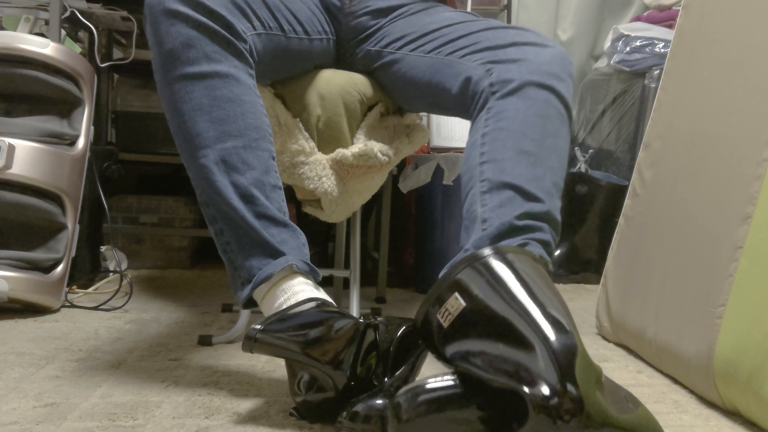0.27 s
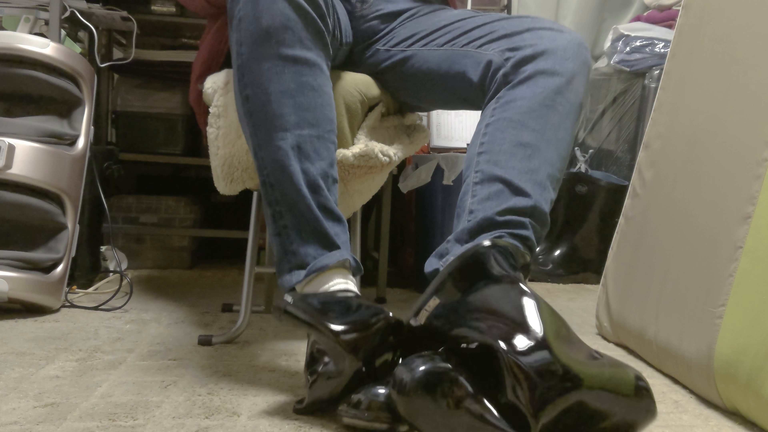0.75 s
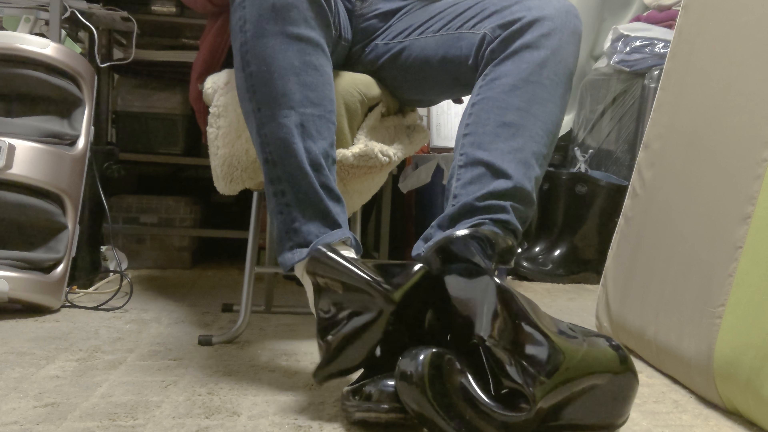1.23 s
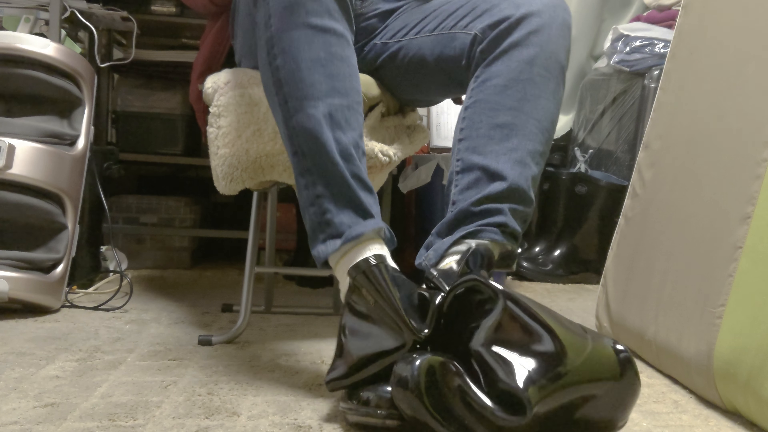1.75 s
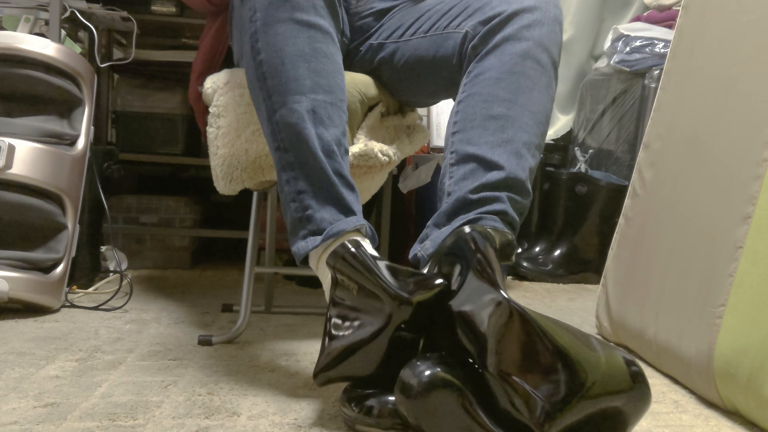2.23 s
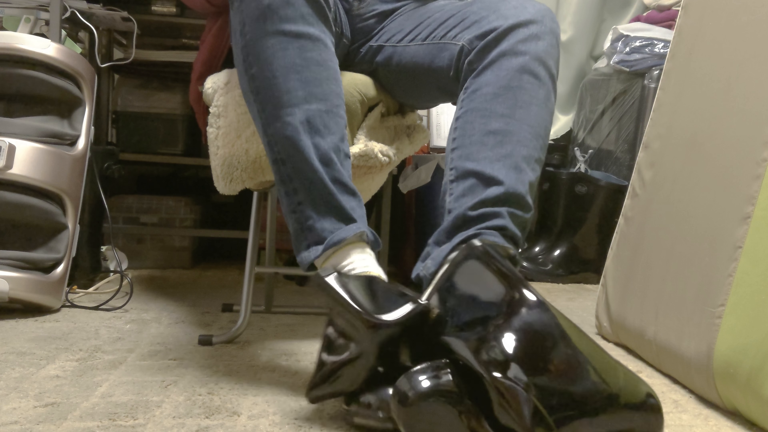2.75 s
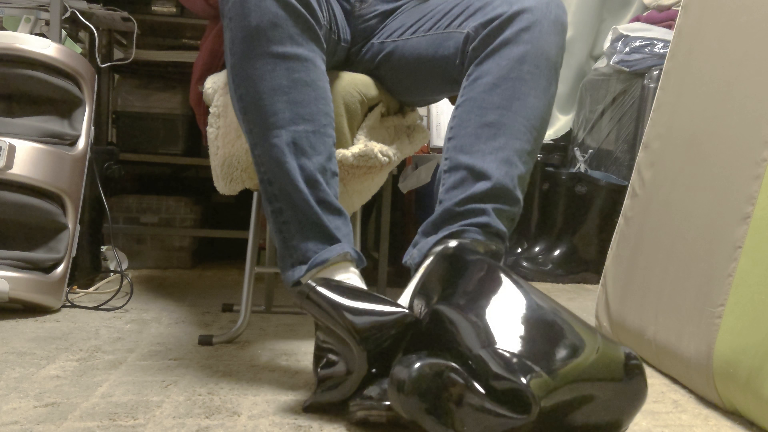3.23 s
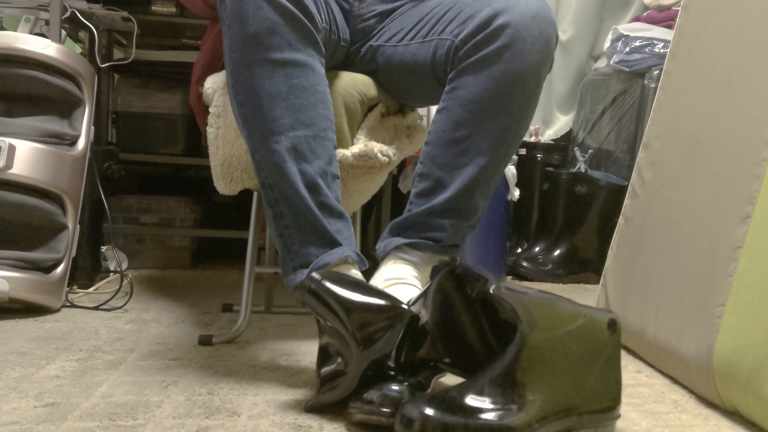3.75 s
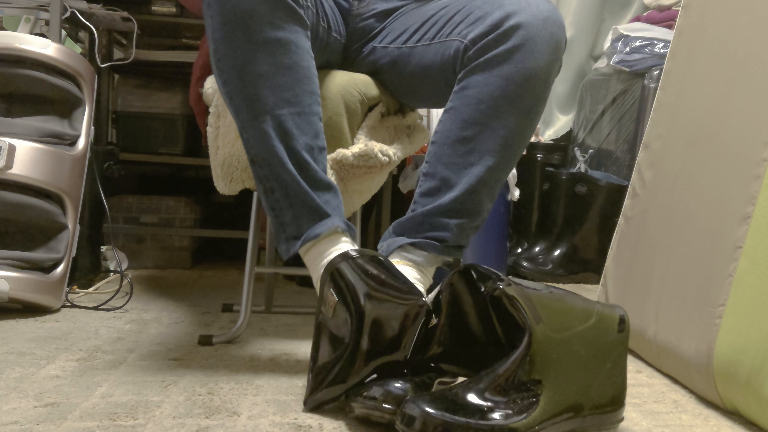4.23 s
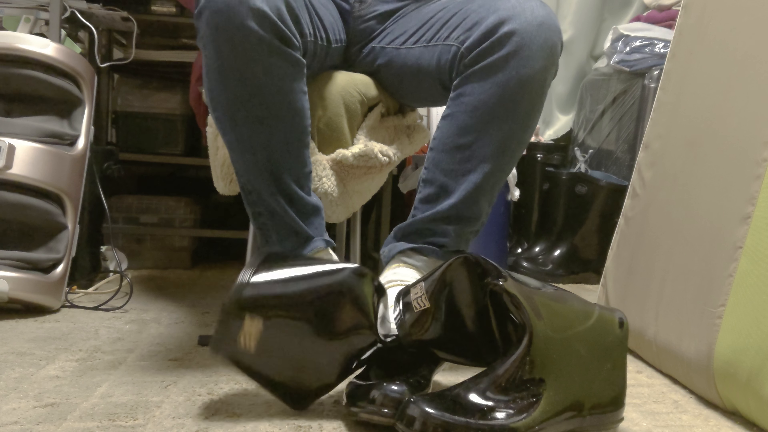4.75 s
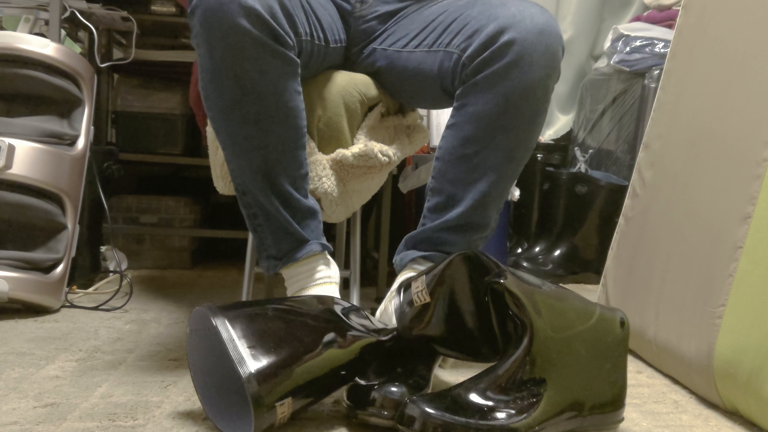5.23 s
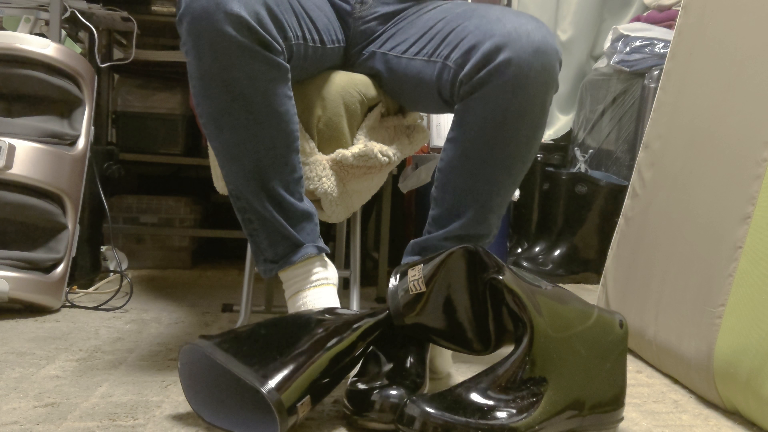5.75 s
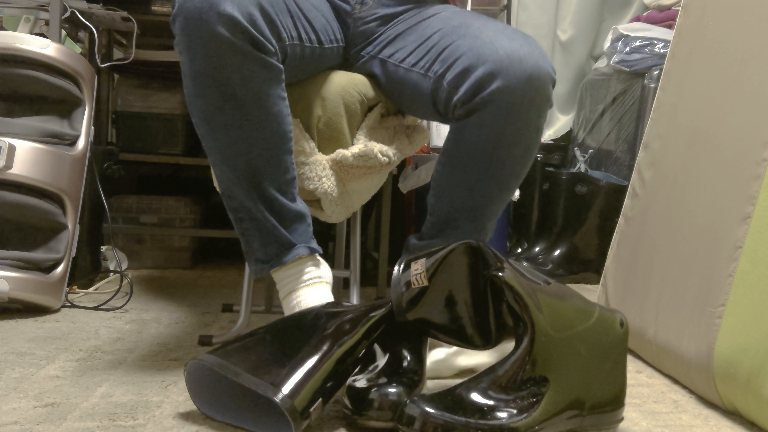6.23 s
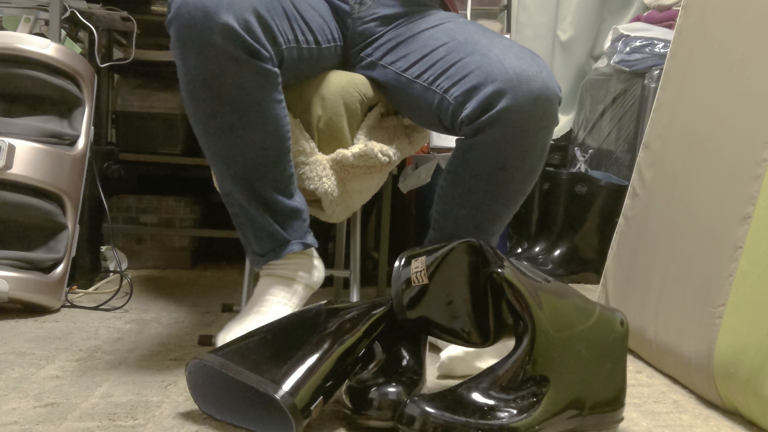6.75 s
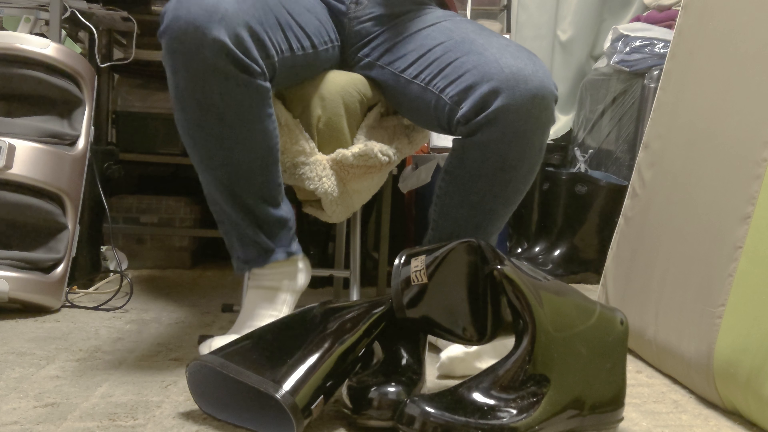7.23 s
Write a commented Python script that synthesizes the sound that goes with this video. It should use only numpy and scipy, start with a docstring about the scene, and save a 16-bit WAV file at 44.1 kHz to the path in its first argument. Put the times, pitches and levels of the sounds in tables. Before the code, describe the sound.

Close up in a small room with a faint low appliance hum, thin glossy rubber boots are rubbed together. Sparse creaks soon become dense bursts of falling chirps, rasps and hollow buckling pops with low soft thuds. A foot slides out with a brief hiss and the boot drops dully. Thinner creaks follow, then soft knocks on the empty rubber, and mostly hum.

```python
"""Throughout, an appliance hums in a small room: unsteady sine lines over coloured noise.
From the start someone seated rubs one glossy rubber boot against the other to work the pair off.
Stick-slip sends bending waves through the thin wall, heard as falling chirps, creaks and rasps.
Soon folds buckle and ring the air in the shafts; flexing boots thud low, some thuds meeting the floor.
Later a sock slides out as hissing noise, a boot drops, and soft knocks sound on the empty boot."""
import sys
import numpy as np
from scipy import signal
from scipy.fft import rfft, irfft
from scipy.io import wavfile
from scipy.ndimage import uniform_filter1d, map_coordinates

SR = 44100
rng = np.random.default_rng(int(sys.argv[2]) if len(sys.argv) > 2 else 0)


def dump(signal):
    """Clip the signal to [-1, 1] and save it as 16-bit WAV at the path in sys.argv[1]."""
    limited = np.clip(np.atleast_2d(signal).T, -1, 1)
    pcm = np.round(limited * 32767).astype(np.int16)
    wavfile.write(sys.argv[1], SR, pcm)


N = 330309
T = np.arange(N) / SR  # time in s

# All levels are relative, ahead of the mix.
# motor hum lines: pitch_hz, level_db
HUM_LINES = [(91.5, -52.5), (150.7, -55), (183.0, -46)]
# spectrum of the moving air: frequency_hz, gain_db
AIR_COLOUR = [(25, -56), (48, -8.5), (88, -3.5), (125, -15.5), (160, -16), (195, -17.5), (230, -20.5),
              (500, -18.5), (720, -8.5), (920, -20.5), (1300, -18.5), (2000, -32.5), (6000, -46),
              (9000, -101)]
# left-right balance of the moving air: frequency_hz, left_minus_right_db
AIR_BALANCE_CURVE = [(200, 1), (380, 5.5), (700, 21), (1300, 14.5), (2400, 0.5)]
# stereo width of the moving air: frequency_hz, side_minus_mid_db
AIR_WIDTH = [(150, -9), (300, 0), (640, -0.5)]
# spectrum of the faint hiss: frequency_hz, gain_db
HISS_COLOUR = [(3000, -29), (9000, 6), (10000, 9), (12000, 2)]
# stereo width of the room's echoes: frequency_hz, side_minus_mid_db
ROOM_WIDTH = [(380, -11), (700, -4), (1300, 0.5)]
# response of the microphone: frequency_hz, gain_db
MIC_RESPONSE = [(24, -38), (38, 0.5), (5600, 1), (6500, -4), (7500, -19.5), (8500, -4), (9100, -9),
                (9900, 4.5)]
# the sock sliding out of the shaft: time_s, level_db
SOCK_SLIDE = [(3.2, -65), (3.49, -53), (3.53, -53), (3.61, -58), (3.66, -75), (3.8, -90)]
# spectrum of the sliding sock and of the crease ticks: frequency_hz, gain_db
SOCK_COLOUR = [(2000, -14), (5000, 17), (10500, 21), (16000, 22)]
# tiny ticks of creases: start_s, level_db
CREASE_TICKS = [(0.441, -47), (1.742, -35), (3.41, -45), (3.474, -37), (3.857, -47), (6.414, -52),
                (6.806, -44.5), (7.417, -49.5)]
# brief squeaks of the glossy skin: start_s, pitch_hz, level_db, length_s
SKIN_SQUEAKS = [(0.958, 5920, -25.5, 0.0082), (1.852, 910, -30, 0.018), (2.669, 4630, -38, 0.027),
                (2.816, 4830, -21, 0.0091), (4.23, 5300, -38, 0.003), (4.248, 5550, -36, 0.0024),
                (4.269, 5600, -32.5, 0.0025), (4.466, 824, -28, 0.02), (4.572, 1017, -32, 0.033),
                (6.804, 5500, -46.5, 0.01), (7.208, 3080, -40.5, 0.015), (7.209, 5280, -48, 0.015)]
# low, soft thuds of the flexing boots, some meeting the floor: start_s, pitch_hz, level_db, t60_s
LOW_THUDS = [(0.976, 50, -23, 0.58), (1.122, 82.2, -26, 0.57), (1.871, 50.7, -27, 0.5),
             (2.848, 87, -23, 0.31), (2.925, 56.3, -18.5, 0.26), (3.845, 82, -13, 0.075),
             (3.868, 46, -17.5, 0.46)]
# soft knocks on the empty boot: start_s, level_db
BOOT_KNOCKS = [(5.07, -30), (5.274, -27), (5.519, -31)]
# spectrum of a knock: frequency_hz, gain_db
KNOCK_SPECTRUM = [(100, -12), (260, 6), (1100, -13), (2500, -43)]
# folds that buckle, each ringing mostly the modes near its own pitch: start_s, level_db, pitch_hz
FOLD_BUCKLES = [(0.9422, -15, 270), (0.969, -8, 270), (1.067, -16, 270), (1.232, -12.5, 260),
                (1.463, -9.5, 266), (1.746, -14.5, 425), (1.867, -10, 445), (1.879, -11, 500),
                (1.902, -20, 480), (1.925, -11, 485), (1.998, -18.5, 500), (2.05, -25, 509),
                (2.547, -17, 411), (2.662, -12, 273), (2.678, -14, 1000), (2.714, -19, 510),
                (2.737, -14.5, 470), (2.798, -12.5, 276), (2.888, -29, 1030), (3.412, -24.5, 390),
                (3.473, -16.5, 374), (3.593, -12, 424), (3.607, -14, 184), (4.059, -23.5, 210)]
# modes of the hollow shaft: pitch_hz (before detuning), t60_s
AIR_MODES = [(184, 0.083), (266, 0.044), (390, 0.058), (432, 0.044), (494, 0.071), (1020, 0.032)]
# rubbing of a tightly stretched patch of skin: start_s, length_s, level_db
TAUT_PATCHES = [(1.158, 0.09, -43), (2.79, 0.12, -39), (4.17, 0.2, -43.5)]
# modes of the stretched skin: pitch_hz (before flexing), level_db
TAUT_MODES = [(1460, -12), (1710, 7.5), (1960, 4), (2720, -8.5), (3570, -8), (4060, -9.5)]
# fast slides that rasp: start_s, length_s, level_db
FAST_SLIDES = [(1.086, 0.044, -39), (1.83, 0.04, -28), (2.38, 0.15, -44), (2.79, 0.125, -41.5),
               (3.497, 0.089, -25.5)]
# spectrum of a rasp: frequency_hz, gain_db
RASP_SPECTRUM = [(250, -8), (440, 10), (600, -4.5), (1100, -3), (1500, -9), (2200, -12.5), (2900, -23.5)]
# strokes of one boot along the other: start_s, length_s, creak_db, scrape_db
BOOT_STROKES = [(0.0, 0.047, -46.5, -43.5), (0.47, 0.48, -45.5, -49.5), (0.778, 0.12, -35.5, -39),
                (0.936, 0.053, -33, -36), (1.077, 0.057, -26.5, -36), (1.159, 0.045, -43, -36),
                (1.252, 0.14, -42, -40.5), (1.387, 0.11, -34, -33), (1.542, 0.17, -40, -39.5),
                (1.726, 0.025, -26, -30), (1.862, 0.056, -37, -35), (1.987, 0.065, -39, -35.5),
                (2.352, 0.19, -39.5, -40.5), (2.648, 0.13, -37, -39.5), (2.794, 0.031, -23.5, -39),
                (2.852, 0.056, -35, -54), (2.943, 0.035, -27.5, -40), (3.034, 0.34, -39.5, -44.5),
                (3.37, 0.32, -45, -43.5), (3.54, 0.075, -28.5, -39.5), (3.611, 0.19, -45, -48.5),
                (3.827, 0.16, -39.5, -47), (4.024, 0.54, -42, -51), (4.215, 0.16, -40, -45),
                (4.434, 0.042, -37, -44)]
# long, faint rubbing in light contact, beneath the strokes: start_s, length_s, creak_db, scrape_db
LIGHT_RUBBING = [(0.083, 4.6, -52, -58.5), (0.814, 2, -53, -47)]
# spectrum of the creaking wall: frequency_hz, gain_db
CREAK_COLOUR = [(110, 4), (180, 4.5), (255, 8.5), (350, 2), (480, 8.5), (560, -0.5), (720, 2.5),
                (1100, -8.5), (1400, -17), (3000, -49)]
# spectrum of the scraping skin: frequency_hz, gain_db
SCRAPE_COLOUR = [(500, -62), (1000, 8), (2000, 6), (3200, 0), (4600, -2), (6000, -8), (9000, -11),
                 (16000, -18)]
# runs of catching and letting go at a nearly even pace: start_s, pace_per_s, strength_db, release_ms
STUTTER_RUNS = [(0.795, 88, -31, 0.17), (0.952, 132, -27.5, 0.017), (2.8, 180, -27, 0.48),
                (3.015, 84, -25, 1.2), (3.106, 46, -26.5, 1.23)]
# big slips of rubber on rubber; a quick release is brighter: start_s, strength_db, release_ms
BIG_SLIPS = [(0.019, -28, 0.88), (0.457, -28.5, 0.58), (0.497, -26, 0.59), (0.53, -22.5, 1.4),
             (0.837, -21, 0.78), (0.8441, -22.5, 0.12), (0.8828, -19, 0.11), (0.916, -21.5, 0.12),
             (0.942, -13.5, 1.3), (0.982, -10, 1.7), (1.0343, -20.5, 0.59), (1.0668, -10.5, 1.3),
             (1.0898, -12.5, 0.46), (1.1005, -12.5, 0.8), (1.1219, -9.5, 0.82), (1.1555, -8.5, 0.48),
             (1.1865, -12, 0.46), (1.229, -10.5, 0.44), (1.2666, -19, 1), (1.291, -22, 0.32),
             (1.3235, -18, 0.6), (1.347, -21.5, 0.5), (1.377, -19.5, 0.69), (1.464, -15, 0.85),
             (1.5378, -20, 0.5), (1.5814, -20, 0.82), (1.646, -17.5, 1.2), (1.654, -21.5, 0.49),
             (1.737, -14.5, 0.99), (1.746, -17, 1.6), (1.8666, -11.5, 1.25), (1.877, -13.5, 1.3),
             (1.925, -13, 1.05), (1.986, -16.5, 1.05), (2.011, -22, 1.5), (2.495, -17.5, 1.9),
             (2.5482, -21, 0.57), (2.627, -21, 0.85), (2.662, -9.5, 0.97), (2.678, -12, 0.64),
             (2.743, -14.5, 0.76), (2.789, -13.5, 0.68), (2.836, -16.5, 0.61), (2.858, -14, 0.99),
             (2.8895, -13, 0.98), (2.95, -15.5, 0.91), (3.053, -26.5, 0.33), (3.063, -21, 1.5),
             (3.085, -28, 0.93), (3.163, -33.5, 0.069), (3.286, -22, 0.7), (3.3147, -19.5, 0.78),
             (3.344, -23.5, 1.4), (3.4109, -19, 1.55), (3.474, -19.5, 0.81), (3.501, -17, 1.3),
             (3.9191, -24, 0.65), (4.058, -25, 0.78), (4.222, -27, 0.49), (4.24, -27, 0.44),
             (4.275, -23, 1.4), (4.2965, -22.5, 0.79), (4.435, -23.5, 1.3), (4.467, -31, 1.6),
             (4.672, -39, 0.32), (7.039, -50, 0.1)]
# spectrum of the wall's answer to a slip: frequency_hz, gain_db
WALL_COLOUR = [(30, -2), (130, -30), (265, 5), (520, 2), (2900, -5), (4500, -4.5), (6500, -23),
               (16000, -21.5)]


def undb(db):
    """Level: twenty decibels are a tenfold amplitude gain."""
    return 10 ** (np.asarray(db) / 20)


def unit(x):
    """Normalization: scale to an rms of 1."""
    return x / np.sqrt(np.mean(x ** 2))


def gains(points, size):
    """Frequency response: gains on the transform's bins, interpolated in dB over log frequency."""
    hz, db = np.transpose(points)
    bins_hz = np.fft.rfftfreq(size, 1 / SR)
    return undb(np.interp(np.log(bins_hz + 1), np.log(hz), db))


def colour(x, points):
    """Linear filtering: multiply the spectrum by a frequency response."""
    size = x.shape[-1]
    return irfft(rfft(x) * gains(points, size), size)


def stereo_noise(side_points, size):
    """Interchannel coherence: two noises are alike where the side signal is weak."""
    side_gain = gains(side_points, size)
    mid, side = rfft(rng.standard_normal((2, size)))
    left, right = mid + side_gain * side, mid - side_gain * side
    return irfft(np.array([left, right]) / np.sqrt(1 + side_gain ** 2), size)


def walk(rate):
    """Random modulation: a smooth fluctuation of spread 1 with about rate new values per second."""
    hold = int(SR / rate)
    steps = np.repeat(rng.standard_normal(N // hold + 1), hold)
    return unit(uniform_filter1d(steps, hold)[:N])


def add(track, start_s, sound):
    """Superposition: sounds that overlap in time add."""
    i = max(int(start_s * SR), 0)
    track[i:i + len(sound)] += sound[:N - i]


def effort(strokes):
    """Contact pressure: each stroke takes hold, stays and dies away; one gain curve per level column."""
    attack_s, release_s = 0.0077, 0.009
    power = np.zeros((len(strokes[0]) - 2, N))
    for start_s, length_s, *levels_db in strokes:
        t = T[:int((length_s + 10 * release_s) * SR)]
        shape = np.minimum(t / attack_s, 1) * np.exp(-np.maximum(t - length_s, 0) / release_s)
        for track, db in zip(power, levels_db):
            add(track, start_s, (undb(db) * shape) ** 2)
    return np.sqrt(power)


def flexing(x, share, rate):
    """Elastic tension: rubber stretches and slackens, so its resonances wander by this rms share."""
    drift = np.cumsum(share * walk(rate))
    return map_coordinates(x, [np.arange(N) + drift], mode="mirror")


def bending_wave(points, travel_s, folds_db, size=2048, count=36):
    """Dispersion: bending waves speed up with the root of frequency, so lows come late (travel_s at 1 kHz)."""
    # chance resonances of the fold, strongest in the treble
    spread_db = folds_db * np.linspace(.4, 1.3, count)
    folds = np.column_stack([np.geomspace(200, 16000, count), spread_db * rng.uniform(-1, 1, count)])
    # a minimum-phase snap: fold the cepstrum onto positive times
    cepstrum = irfft(np.log(gains(points, size) * gains(folds, size)))
    cepstrum[1:size // 2] *= 2
    cepstrum[size // 2 + 1:] = 0
    phase = 4 * np.pi * travel_s * np.sqrt(1000 * np.fft.rfftfreq(size, 1 / SR))
    return irfft(np.exp(rfft(cepstrum) - 1j * phase))


def micro_slips(rate, scatter_db, travel_s, count=200):
    """Irregular stick-slip: rate small slips per second; each successive fold has its own colour."""
    gap, size, sign = rng.random((int(rate * N / SR), 3)).T
    clock = np.cumsum(.3 - np.log(gap))  # uneven intervals, never shorter than a minimum
    train = np.zeros(N)
    places = (clock / clock[-1] * (N - 1)).astype(int)
    train[places] = np.sign(sign - .5) * undb(scatter_db * size ** 2)
    edges = (np.arange(count + 1) * N / count).astype(int)  # a new fold grips every 0.037 s
    out = np.zeros(N)
    for start, stop, path in zip(edges, edges[1:], .5 + rng.random(count)):
        snap = bending_wave([(20, 0), (20000, 0)], travel_s * path, folds_db=6)
        add(out, start / SR, unit(signal.fftconvolve(train[start:stop], snap) + 1e-9))
    return unit(out)


def appliance(hum_db=-1, air_db=-46.5, hiss_db=-65):
    """Tonal and broadband noise: a wavering motor hum and moving air from the left, over an even hiss."""
    hum = np.zeros(N)
    for hz, db in HUM_LINES:
        level = undb(db + 1.3 * walk(9))
        phase = 2 * np.pi * np.cumsum(hz + 2.5 * walk(20)) / SR
        hum += level * np.sqrt(2) * np.sin(phase)
    left, right = colour(stereo_noise(AIR_WIDTH, N), AIR_COLOUR)
    air = np.array([left, colour(right, [(hz, -db) for hz, db in AIR_BALANCE_CURVE])])
    air *= undb(air_db) / air.mean(axis=0).std()
    hiss = unit(colour(rng.standard_normal((2, N)), HISS_COLOUR))
    return undb(hum_db) * hum * undb([[1.2], [-1.2]]) + air + undb(hiss_db) * hiss


def room(x, early_db=-8, early_s=0.003, tail_db=-12, tail_t60=0.27, count=12):
    """Reflection and reverberation: floor and furniture answer in milliseconds, then a short tail."""
    t = T[:SR // 2]
    # the echoes change as the contact moves about: blend several places at constant power
    places = np.array([walk(8) for _ in range(count)])
    places /= np.sqrt(np.sum(places ** 2, axis=0))
    out = np.array([np.roll(x, shift=1), x])  # the direct sound reaches the right channel first
    for share in places:
        early = stereo_noise(ROOM_WIDTH, len(t)) * np.exp(-t / early_s) * (t > .0008)
        tail = stereo_noise(ROOM_WIDTH, len(t)) * np.exp(-np.log(1000) * t / tail_t60) * (t > .008)
        echoes = (undb(early_db) * unit(early) + undb(tail_db) * unit(tail)) / np.sqrt(len(t))
        echoes = colour(echoes, [(350, -0.5), (1000, 6.0), (5000, 8), (11000, 4.0)])
        out += signal.oaconvolve((share * x)[None], echoes, axes=1)[:, :N]
    return 0.71 * out * undb([[.3], [-.3]])


def sock():
    """Friction noise: fabric hisses along the lining as the foot comes free."""
    slide_db = np.interp(T, *np.transpose(SOCK_SLIDE), left=-120, right=-120)
    level = undb(slide_db + 2 * walk(220))
    return level * unit(colour(rng.standard_normal((2, N)), SOCK_COLOUR))


def ticks(decay_s=0.00077, tick_db=-8):
    """Impulsive release: creases let go with a thin bright tick of decaying noise."""
    out, t = np.zeros(N), T[:SR // 100]
    for start_s, db in CREASE_TICKS:
        add(out, start_s, undb(db + tick_db) * np.exp(-t / decay_s) * rng.standard_normal(len(t)))
    return colour(out, SOCK_COLOUR)


def squeaks(rough=0.14):
    """Rapid stick-slip: very fast cycles fuse into a short, unsteady whistle."""
    out = np.zeros(N)
    for start_s, hz, db, length_s in SKIN_SQUEAKS:
        u = 4 * T[:SR // 8] / length_s  # the envelope peaks at u = 1
        phase = 2 * np.pi * np.cumsum(hz * (1 + rough * walk(hz)[:len(u)])) / SR
        add(out, start_s, undb(db) * u * np.exp(1 - u) * np.sin(phase))
    return out


def thuds(rise_s=0.0047, overtone_db=-18):
    """Damped vibration: the flexing boots thud low and soft, some on the floor, with a weak overtone."""
    out, t = np.zeros(N), T[:SR // 2]
    for start_s, hz, db, t60 in LOW_THUDS:
        phase = 2 * np.pi * hz * t
        thud = np.sin(phase) + undb(overtone_db) * np.sin(1.8 * phase)
        envelope = np.exp(-np.log(1000) * t / t60) * (1 - np.exp(-t / rise_s))
        add(out, start_s, undb(db) * envelope * thud)
    return out


def knocks(travel_s=0.00337):
    """Dispersion over a long path: a nudge sends a dull wave down the slack shaft, slowly falling in pitch."""
    out = np.zeros(N)
    for start_s, db in BOOT_KNOCKS:
        wave = bending_wave(KNOCK_SPECTRUM, travel_s, folds_db=6)
        add(out, start_s, undb(db) * wave / np.abs(wave).max())
    return out


def buckles(ring_db=3.5, rise_s=0.00085, sag=0.0081, other_modes_db=-20):
    """Cavity resonance: a buckling fold rings the shaft's air; its moving wall makes pitch sag and shake."""
    width_octaves, detune_share = 0.087, 0.028
    out, t = np.zeros(N), T[:SR // 3]
    shake = np.cumsum(.025 * walk(500))
    hz, t60 = np.transpose(AIR_MODES)[:, :, None]
    fade = undb(-60 * t / t60)
    sagging = np.cumsum(1 + sag * (fade - .5), axis=1)
    for (start_s, db, fold_hz), detune in zip(FOLD_BUCKLES, rng.uniform(-1.8, 1, len(FOLD_BUCKLES))):
        near = np.exp(-(np.log2(hz / fold_hz) / width_octaves) ** 2)
        share = near / near.max() + undb(other_modes_db)
        drift = shake[int(start_s * SR):][:len(t)]
        mode_hz = hz * (1 + detune_share * detune)
        phase = 2 * np.pi * mode_hz * (sagging + drift - drift[0]) / SR
        ring = np.sum(share * fade * np.sin(phase), axis=0) / np.linalg.norm(share)
        add(out, start_s, undb(db + ring_db) * (1 - np.exp(-t / rise_s)) * ring)
    return out


def taut_skin(ring_s=0.0031):
    """Driven resonance: crowded slips keep the narrow modes of the stretched skin ringing."""
    t = T[:SR // 20]
    modes = sum(undb(db) * np.sin(2 * np.pi * hz * t) for hz, db in TAUT_MODES)
    ring = modes * np.exp(-t / ring_s)
    dense = micro_slips(rate=1500, scatter_db=10, travel_s=.0004)
    sung = flexing(signal.oaconvolve(dense, ring)[:N], share=0.018, rate=10)
    return effort(TAUT_PATCHES)[0] * unit(sung)


def rasps():
    """Dense stick-slip: in a fast slide the slips crowd together into a fine, even rasp."""
    dense = micro_slips(rate=1800, scatter_db=8, travel_s=.0008)
    return effort(FAST_SLIDES)[0] * unit(colour(dense, RASP_SPECTRUM))


def rubbing(creak_db=4.5, scrape_db=-2, flex_db=-15):
    """Friction excitation: small slips creak in the wall and scrape its surface, while the shaft flexes."""
    creak, scrape = effort(BOOT_STROKES + LIGHT_RUBBING)
    coarse = micro_slips(rate=430, scatter_db=24, travel_s=.0011)
    fine = micro_slips(rate=520, scatter_db=30, travel_s=.0004)
    wall = unit(flexing(colour(coarse, CREAK_COLOUR), share=.06, rate=20))
    surface = unit(colour(1.1 * coarse + fine, SCRAPE_COLOUR))
    shaft = unit(colour(rng.standard_normal(N), [(25, -31), (50, 1), (90, 3), (250, -25.0)]))
    return undb(creak_db) * creak * wall + undb(scrape_db) * scrape * surface + undb(flex_db) * creak * shaft


def stutters(count=8, jitter=0.14, scatter_db=3.5):
    """Near-periodic stick-slip: short runs of slips, slightly uneven in pace and strength."""
    rows = []
    for start_s, rate, db, release_ms in STUTTER_RUNS:
        late, strong = rng.standard_normal((count, 2)).T
        times = start_s + (np.arange(count) + jitter * late) / rate
        rows += [(s, db + scatter_db * k, release_ms) for s, k in zip(times, strong)]
    return rows


def slips(travel_s=0.001333, slip_db=-3, chatter_db=-10, chatter_s=0.014,
          wobble_db=-26, wobble_hz=47, wobble_s=0.14):
    """Stick-slip: each release is a falling chirp, dull above 1 / release time, with chatter and wobble."""
    rolloff_db_per_octave, chatter_per_s = 12.5, 900
    low_cut = 0.049  # a quick slip moves a small patch: no bass under this share of 1 / release time
    out, t = np.zeros(N), T[:SR // 3]
    hz = np.geomspace(30, 16000, 40)
    colour_hz, colour_db = np.transpose(WALL_COLOUR)
    wall_db = np.interp(np.log(hz), np.log(colour_hz), colour_db)
    wobble = np.exp(-t / wobble_s) * np.sin(2 * np.pi * wobble_hz * t)  # of the whole shaft
    for start_s, db, release_ms in BIG_SLIPS + stutters():
        cycles = hz * release_ms / 1000  # within one release
        octaves_over = np.log2(1 + cycles ** 3) / 3
        thin_db = 10 * np.log10(1 + (low_cut / cycles) ** 2)
        points = np.column_stack([hz, wall_db - rolloff_db_per_octave * octaves_over - thin_db])
        snap = bending_wave(points, travel_s * rng.uniform(0.727, 1.274), folds_db=4.5)
        snap *= np.sqrt(.004 * SR / np.sum(snap ** 2))  # rms 1 over 4 ms
        # the contact chatters briefly after the main slip
        hits = (rng.random(len(t)) < chatter_per_s / SR) * rng.uniform(-1.17, 1, len(t))
        jerks = undb(chatter_db) * hits * np.exp(-t / chatter_s)
        jerks[0] = 1
        chirps = signal.fftconvolve(np.trim_zeros(jerks[:SR // 10]), snap)
        add(out, start_s, undb(db + slip_db) * chirps)
        add(out, start_s, undb(db + wobble_db) * wobble)
    return out


def scene():
    """Superposition of sources: the boots in the room, the sock and the appliance."""
    boots = thuds() + knocks() + ticks() + squeaks() + buckles()
    boots += taut_skin() + rasps() + rubbing() + slips()
    return appliance() + sock() + room(boots)


def record(dry):
    """Transducer response: the microphone has a deep notch in the treble, and the top is cut."""
    top_cut = signal.ellip(10, .2, 70, 15950, fs=SR, output="sos")  # order, ripple dB, stop dB, edge Hz
    return signal.sosfilt(top_cut, colour(dry, MIC_RESPONSE))


dry = scene()
out = record(dry)
dump(out)
```